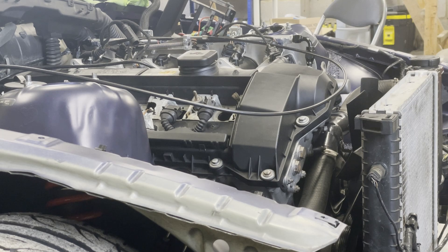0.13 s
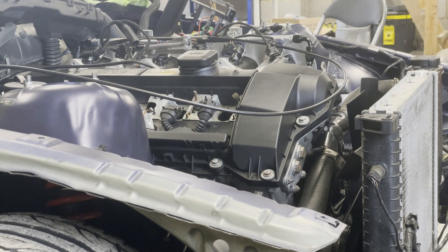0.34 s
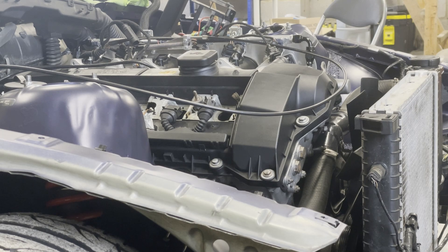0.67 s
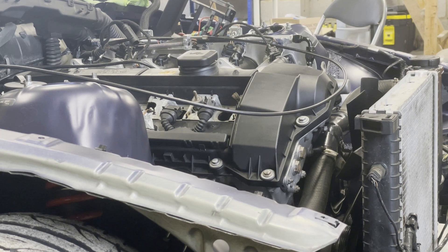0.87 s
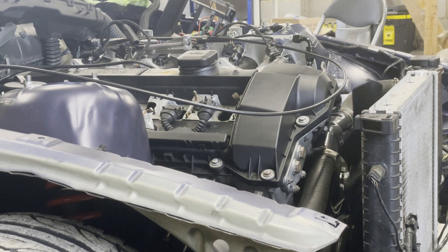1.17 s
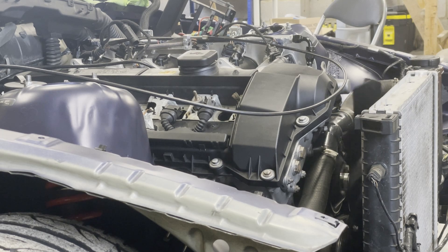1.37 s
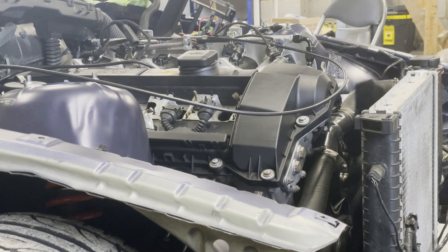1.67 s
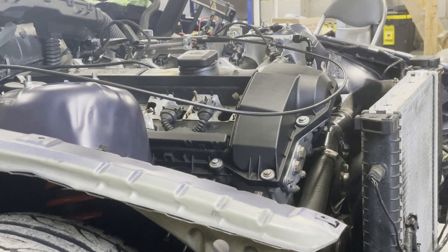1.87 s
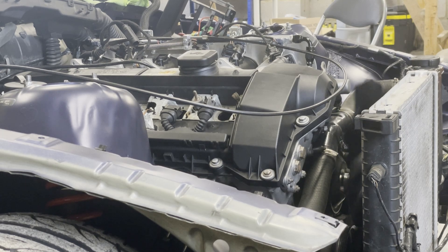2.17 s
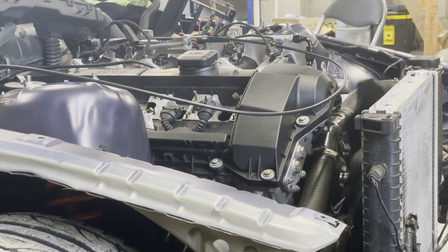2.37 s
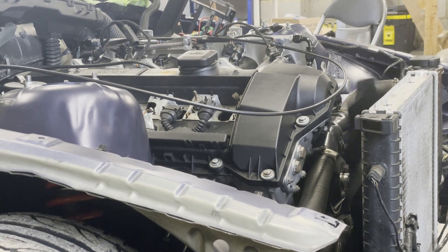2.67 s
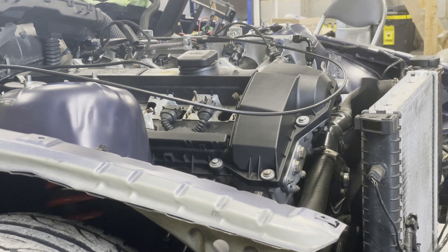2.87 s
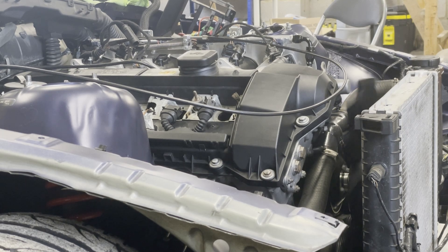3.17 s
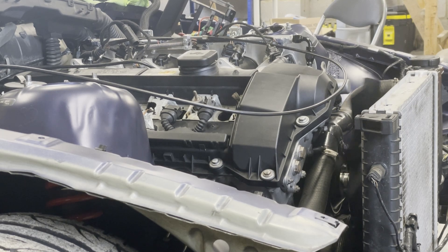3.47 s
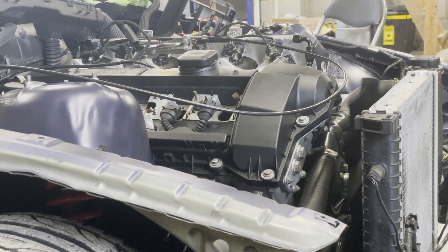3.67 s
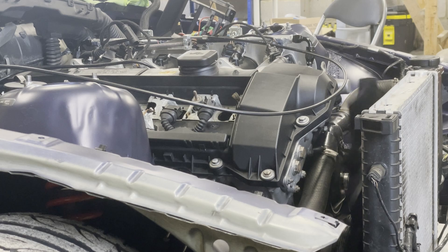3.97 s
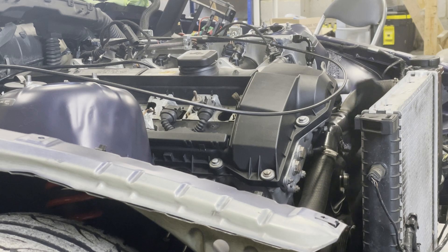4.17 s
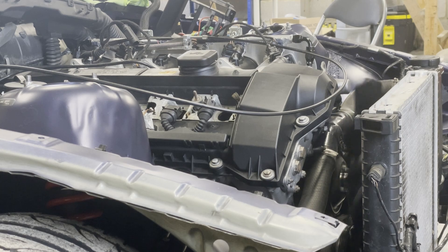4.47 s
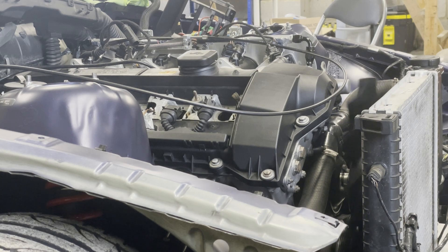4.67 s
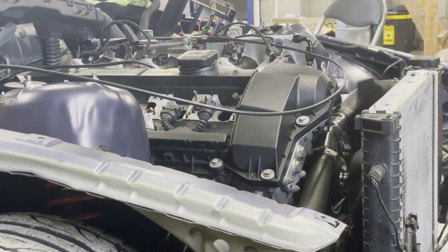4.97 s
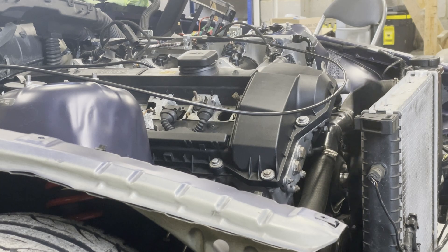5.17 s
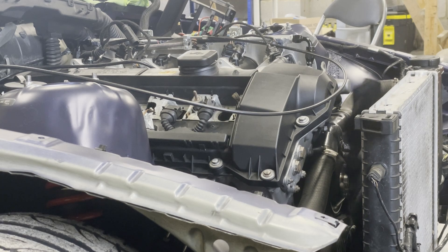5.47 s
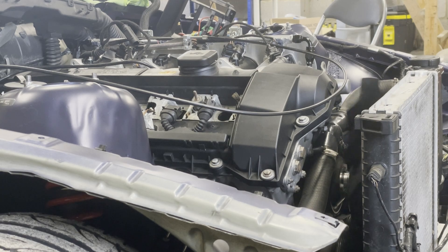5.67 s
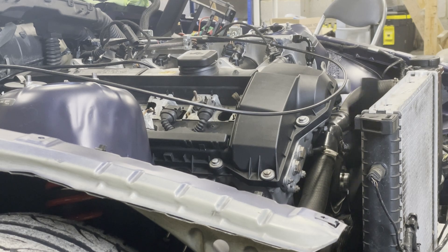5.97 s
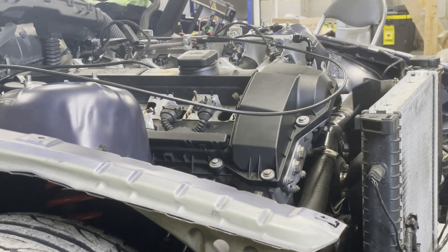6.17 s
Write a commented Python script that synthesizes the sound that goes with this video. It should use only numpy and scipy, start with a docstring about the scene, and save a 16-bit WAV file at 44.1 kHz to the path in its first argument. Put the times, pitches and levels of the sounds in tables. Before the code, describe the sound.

Close beside an open engine bay: near silence, a faint falling pump whirr, then a loud clash of gear teeth and a quick rising whir. The engine labours through its first slow compressions, then turns steadily at nearly eight pulses a second, gear whine swelling and sagging over deep soft booms and rattling metal. No ignition; it stops abruptly with a click and a dying hiss in a small hard room.

```python
"""Garage: a starter motor cranks a six-cylinder engine that does not fire.
A small pump winds down as a rough hum; the solenoid throws the pinion in with noise bursts and ringing modes.
Each compression loads the gears and slows them: tooth-rate whine, shaken block, drone, rattle, hiss.
Exhaust strokes of one bank boom as two pipe tones, rising as the piston climbs; squeaks come with the turns."""
import sys
import numpy as np
from scipy import signal
from scipy.fft import rfft, irfft, next_fast_len
from scipy.io import wavfile
from scipy.ndimage import uniform_filter1d

SR = 44100
rng = np.random.default_rng(int(sys.argv[2]) if len(sys.argv) > 2 else 0)


def inscribe(sig):
    """Save sig as 16-bit PCM at rate SR to the path in sys.argv[1].

    A 1-D sig is mono; a 2-D sig holds one channel per row.
    Samples are clipped to [-1, 1] before scaling.
    """
    pcm = np.round(np.clip(np.atleast_2d(sig).T, -1, 1) * 32767)
    wavfile.write(sys.argv[1], SR, pcm.astype(np.int16))


N = 279153


def from_db(db):
    """Gain of a level in dB."""
    return 10 ** (np.asarray(db) / 20)


def rms_one(x):
    """Scale to rms 1."""
    return x / np.sqrt(np.mean(x ** 2) + 1e-20)


def in_time(rows):
    """Table columns after time, linearly interpolated per sample."""
    time_s, *columns = np.transpose(rows)
    return [np.interp(np.arange(N) / SR, time_s, column) for column in columns]


def at_hz(points, hz):
    """Spectrum table interpolated on a log-frequency axis."""
    table_hz, values = np.array(points).T[:2]
    return np.interp(np.log(hz), np.log(table_hz), values)


def drift(rate_hz):
    """Slow random signal, rms 1: two-pole lowpass noise, computed at SR / 40."""
    r = np.exp(-80 * np.pi * rate_hz / SR)
    noise = rng.standard_normal(N // 40 + 2002)
    slow = signal.lfilter([1], [1, -2 * r, r * r], noise)[2000:]
    return np.interp(np.arange(N) / 40, np.arange(len(slow)), rms_one(slow))


def resonance(x, hz, width_hz):
    """Two-pole band, gain about 1 at its peak."""
    r = np.exp(-np.pi * width_hz / SR)
    zeros = np.array([1, 0, -1]) * (1 - r * r) / 2
    poles = [1, -2 * r * np.cos(2 * np.pi * hz / SR), r * r]
    return signal.lfilter(zeros, poles, x)


# left-right likeness: (frequency [Hz], likeness [0-1])
LIKENESS = [(380, 0.98), (950, 0.67), (2400, 1), (4500, 0.74), (7000, 0.69), (15000, 1)]
# phase lead of left over right: (frequency [Hz], lead [rad])
LEAD = [(100, 0), (430, .3), (1380, -.3), (3200, .5), (5200, .5), (6800, -.9), (8400, -3.0), (9400, -3.3),
        (11800, -6.2)]


def widen(mid, side):
    """Stereo: mid reaches left and right out of phase by LEAD, side enters with opposite signs."""
    hz = np.maximum(np.fft.rfftfreq(N, 1 / SR), 10)
    alike = np.clip(at_hz(LIKENESS, hz), 0, 1)
    sign = np.array([[1], [-1]])
    direct = rfft(mid) * np.sqrt(1 + alike) * np.exp(.5j * at_hz(LEAD, hz) * sign)
    return irfft(direct + rfft(side) * np.sqrt(1 - alike) * sign, N)


def coloured(spectrum):
    """Stereo noise of the given spectrum, rms 1."""
    hz = np.maximum(np.fft.rfftfreq(N, 1 / SR), 10)
    mid, side = irfft(rfft(rng.standard_normal((2, N))) * from_db(at_hz(spectrum, hz)), N)
    return rms_one(widen(mid, side))


# block and bell housing modes: (frequency [Hz], base width [Hz], relative level [dB])
BODY = [(268, 35, -8.5), (441.4, 36, -3.5), (568.7, 45, 2), (747.3, 46, 3), (884.5, 73, 2),
        (1115, 68, -1.5), (1302, 140, -1.5), (1525, 17, -5.5), (1585, 16, -7), (2100, 22, -7.5),
        (2222, 37, -4.5), (2797, 39, -6.5), (3176, 38, -9.5)]


def through_body(x, spread, waver_db):
    """Sum of wavering body resonances, base widths times spread."""
    out = 0
    for hz, width_hz, db in BODY:
        ring = resonance(resonance(x, hz, spread * width_hz), hz, spread * width_hz)
        out = out + from_db(db + waver_db * drift(16.0)) * ring / np.sqrt(width_hz / 50)
    return out


# starter effort, spin-up, long pull, key let go: (time [s], level [dB])
EFFORT = [(1.12, -7.5), (1.3, -1.5), (5.99, -1.5), (6.15, -7), (6.23, -18), (6.33, -26.5)]
# slow first compressions: (time [s], compressions passed [count])
SPIN_UP = [(1.12, 1.3), (1.24, 1.7), (1.488, 2.63), (1.655, 3.75)]
FIRST_COMPRESSION_S = 1.114   # a quarter stroke before the first exhaust stroke


def crank():
    """Half exhaust strokes passed, compressions passed, smoothed compressions per second, effort gain."""
    t = np.arange(N) / SR
    start_s = np.transpose(STROKES)[0]
    start_s = np.r_[FIRST_COMPRESSION_S, start_s, 2 * start_s[-1] - start_s[-2]]
    passed = np.r_[0, .5 + 2 * np.arange(len(start_s) - 1)]
    early_s, early = np.transpose(SPIN_UP)
    half_strokes = np.interp(t, start_s, passed)
    count = np.interp(t, np.r_[early_s, start_s[3:]], np.r_[early, passed[3:]])
    rate = uniform_filter1d(np.gradient(count) * SR, size=SR // 3)
    clash_s = ENGAGE[-1][0]
    effort = from_db(in_time(EFFORT)[0]) * (t > clash_s)
    return half_strokes, count, rate, effort


# quiet room noise: (frequency [Hz], relative density [dB per Hz])
FLOOR = [(25, -3.5), (70, -5.5), (700, -33), (3600, -46), (16000, -62)]
FLOOR_DB = -58.5


def room_floor():
    """Steady coloured noise, slowly wavering."""
    return from_db(FLOOR_DB + 2 * drift(6.9)) * coloured(FLOOR)


# pump: (time [s], pitch [Hz], hum level [dB], thud level [dB], air level [dB])
PUMP = [(0, 415, -74, -90, -57.5), (.19, 433, -59, -56, -57), (.225, 413, -68, -38.5, -56),
        (.4, 342, -66, -56, -75), (.46, 340, -95, -75, -86)]
# pump air noise: (frequency [Hz], relative density [dB per Hz])
AIR = [(180, -43), (300, -16), (2400, -28), (2850, -18), (3400, -26), (16000, -40)]
# pump low thud: (frequency [Hz], relative density [dB per Hz])
THUD = [(30, -25), (86, 0), (268, -16), (1200, -47)]


def pump():
    """Faint wavering three-harmonic hum, falling in pitch, plus air noise and a low thud."""
    hz, hum_db, thud_db, air_db = in_time(PUMP)
    turn = 2 * np.pi * np.cumsum(hz) / SR
    hum = sum(from_db(-5 * k + 2.9 * drift(21.4)) * np.sin((k + 1) * turn) for k in range(3))
    live = hum_db > PUMP[-1][2]
    thud = from_db(thud_db) * coloured(THUD)
    air = from_db(air_db) * coloured(AIR)
    return live * (from_db(hum_db) * hum + thud + air)


# pump switch, solenoid tick, pinion thrown out, pinion clash:
# (time [s], level before crack [dB], t60 [s], rise [s])
ENGAGE = [(0.182, -43, .15, 0.012), (1.062, -43, 0.7, 0.015), (6.052, -17, 0.18, 0.0027),
          (1.107, -5.5, 0.34, 0.0023)]
# pinion and starter nose modes: (frequency [Hz], relative level [dB])
PINION = [(1330, -14), (2600, 1.5), (5460, -8)]
# broad crash: (frequency [Hz], relative density [dB per Hz])
CLASH = [(120, -28.5), (200, -7), (870, -12.5), (1320, 0), (2700, -8), (6600, -8), (12000, -13.5)]
PINION_WIDTH_HZ, RING_DB = 100, 4
CRACK_DB, CRACK_S = 7, 0.0075   # louder crack opening each burst, its decay constant


def engage():
    """Fast-dying impacts: a broad crash and the ringing pinion modes."""
    t = np.arange(N) / SR
    fade = 0
    for time_s, db, t60_s, rise_s in ENGAGE:
        since_s = np.maximum(t - time_s, 0)
        burst_db = db - 60 * since_s / t60_s + CRACK_DB * np.exp(-since_s / CRACK_S)
        fade = fade + from_db(burst_db) * np.clip((t - time_s) / rise_s, 0, 1)
    blows = fade * rng.standard_normal((2, N))
    rings = sum(from_db(db) * resonance(blows, hz, PINION_WIDTH_HZ) for hz, db in PINION)
    return from_db(-6.0) * fade * coloured(CLASH) + from_db(RING_DB) * widen(*rings)


# pinion sliding in: (time [s], pitch [Hz], mean level [dB])
WHIR = [(1.11, 1230, -30), (1.185, 1367, -26), (1.22, 1390, -39)]


def whir():
    """Rising sine of the pinion, roughened by fast level drift."""
    hz, db = in_time(WHIR)
    t = np.arange(N) / SR
    live = (t > WHIR[0][0]) & (t < WHIR[-1][0])
    return live * from_db(db + 5 * drift(70)) * np.sin(2 * np.pi * np.cumsum(hz) / SR)


# slack take-up moment of each of the six cylinders: [share of compression interval]
JOLT_SHARES = [.58, .70, .63, .715, .655, .545]


def taken_up(count):
    """Count bent so each cylinder's jolt falls on the rise of the load table."""
    k = np.arange(int(count.max()) + 2)[:, None]
    jolt = np.array(JOLT_SHARES)[k % 6]
    free, rise = LOAD[3][0], LOAD[4][0]
    actual = k + np.c_[0 * jolt + free, jolt, 0 * jolt + 1]
    nominal = k + [free, rise, 1]
    return np.interp(count, actual.ravel(), nominal.ravel())


RATTLE_PER_S, RATTLE_DB = 600, -33.5   # contact rate at 0 dB load; rms level


def rattle(load_db):
    """Loose metal contacts: random clicks, denser under load, each ringing one of 12 pitches."""
    sizes = from_db(2.2 * np.minimum(rng.exponential(1, N), 5)) * rng.choice([-1, 1], N)
    born = rng.random(N) < RATTLE_PER_S * from_db(load_db + 3 * drift(8)) / SR
    pitches_hz = np.geomspace(2500, 6500, 12)
    dealt = rng.integers(0, len(pitches_hz), N)
    rings = 0
    for k, hz in enumerate(pitches_hz):
        rings = rings + resonance(sizes * born * (dealt == k) + 1e-18, hz, PINION_WIDTH_HZ)
    return from_db(RATTLE_DB) * rms_one(widen(rings, np.roll(rings, SR // 70)))


# one compression; teeth take up slack with a jolt, lose contact past the top:
# (interval share [0-1], relative load [dB], relative tooth noise [dB], relative whine [dB])
LOAD = [(0, 1.5, 0.5, 1), (.2, 1, -0.5, -6), (.32, -1, -2, -13), (.45, -4, -2.5, -21), (.64, -6, -2, -24),
        (.69, -2.5, -1.5, -8), (.85, 0, 0, -1)]
# gear whine: (multiple of tooth rate, relative level [dB])
MESH = [(1, -29), (2, -26.5), (3, -34), (4, -29.5)]
# armature whine: (multiple of tooth rate, relative level [dB])
ARMATURE = [(8, -1), (12, -11)]
# slow colour: (time [s], housing drone [dB], gear whine [dB], armature whine [dB])
STARTER = [(1.21, -34, -16, -44), (1.27, -16.5, -29, -35), (1.38, -31, -3.5, -45), (1.55, -22, 2, -34),
           (1.7, -32.5, 1, -24), (4.6, -28.5, 1, -25), (6.1, -27, 0.5, -28.5)]
# tooth and brush noise: (frequency [Hz], relative density [dB per Hz])
GRIND = [(76, -48), (150, -10), (280, -2), (400, -10), (680, -12), (1000, -9.5), (1700, -13.5),
         (3500, -15.5), (6600, -19.5), (11000, -24.5), (16000, -30.5)]
BODY_DB, GRIND_DB = -20.5, -21   # before load and effort
DRONE_HZ, DRONE_WIDTH_HZ = 884, 62   # width of each of two passes
TEETH = 37.3   # ring gear teeth per compression
SPEED_SWING, FASTEST_AT = 0.1144, .72   # share of speed, share of interval
JOLT_DB, JOLT_FADE = -2, 0.12   # mean level over the hiss at full effort, share of interval
HISS_FOLLOWS = .7   # exponent on effort: hiss runs on after the key is let go


def starter(count, rate, effort):
    """Gear and armature whine, ringing block, drone, rattle and hiss, driven by tooth load."""
    share, *levels = np.transpose(LOAD)
    bent = taken_up(count)
    since_jolt = np.maximum(bent - LOAD[4][0], 0) % 1
    load_db, noise_db, mesh_db = (np.interp(bent, share, db, period=1) for db in levels)
    drone_db, gear_db, armature_db = in_time(STARTER)

    # slows up each compression, speeds up past it
    swing = 1 + SPEED_SWING * np.cos(2 * np.pi * (count - FASTEST_AT))
    tooth = np.cumsum(TEETH * rate * swing * (1 + 0.00799 * drift(29.4))) / SR

    whine = 0
    for k, db in MESH:
        whine = whine + from_db(db + gear_db + mesh_db + 1.6 * drift(22.0)) * np.sin(2 * np.pi * k * tooth)
    rough = 1 + .45 * drift(110)   # uneven brush contact smears the line
    armature = sum(from_db(db) * np.sin(2 * np.pi * k * tooth) for k, db in ARMATURE)
    whine = whine + from_db(armature_db + mesh_db) * rough * armature
    whine = whine + through_body(whine, spread=4.84, waver_db=1)   # lines flare crossing a resonance
    whine = widen(whine, np.roll(whine, SR // 90))

    # tooth contacts modulate the noise shaking the block
    shake = rng.standard_normal((2, N)) * (1 + 0.58 * np.cos(2 * np.pi * tooth))
    block = rms_one(widen(*through_body(shake, spread=1.04, waver_db=2.0)))
    block = from_db(BODY_DB + 1.09 * load_db) * block

    drone = resonance(rng.standard_normal((2, N)), DRONE_HZ, DRONE_WIDTH_HZ)
    drone = resonance(drone, DRONE_HZ, DRONE_WIDTH_HZ)
    drone = from_db(drone_db + 0.71 * load_db + 0.86 * drift(8.7)) * rms_one(widen(*drone))

    hiss = from_db(GRIND_DB + noise_db + 0.99 * drift(9.7)) * coloured(GRIND)
    jolt = from_db(JOLT_DB + 2 * drift(3.0)) * np.exp(-since_jolt / JOLT_FADE)
    hiss = hiss * (1 + (count > 2) * effort * jolt)
    metal = whine + block + drone + rattle(1.2 * noise_db)
    return effort * metal + effort ** HISS_FOLLOWS * hiss


# dull block knocks, the first as the pinion seats: (time [s], blow level [dB])
KNOCKS = [(1.176, -3), (1.689, -1.5), (5.835, -3)]
KNOCK_T60_S = 0.13


def knocks():
    """Decaying noise blows ringing the block."""
    t = np.arange(N) / SR
    fade = 0
    for time_s, db in KNOCKS:
        fade = fade + from_db(db - 60 * np.maximum(t - time_s, 0) / KNOCK_T60_S) * (t > time_s)
    blow = fade * rng.standard_normal((2, N))
    return widen(*through_body(blow + 1e-18, spread=1.9, waver_db=1.5))


# exhaust strokes, each pushing the pipe twice: (start [s], lower tone first push [dB],
# lower second push [dB], upper tone first push [dB], upper second push [dB])
STROKES = [(1.203, -10, -26.5, -17, -25.5), (1.49, -3, -11, -24, -16), (1.76, -6.5, -14.5, -19, -13),
           (2.034, -5, -15, -11, -19), (2.303, -9, -10, -11.5, -18.5), (2.565, -6, -13, -18.5, -20.5),
           (2.825, -5, -14.5, -11.5, -22), (3.09, -17, -9.5, -12, -17), (3.356, -5.5, -13, -18.5, -12),
           (3.624, -4.5, -12, -15, -21), (3.9, -8, -12.5, -21, -16), (4.176, -8, -12, -15, -20),
           (4.455, -7.5, -19, -15, -13), (4.736, -9.5, -18.5, -14, -21.5), (5.022, -7, -12.5, -20, -15.5),
           (5.313, -3.5, -13.5, -23.5, -14), (5.61, -19, -11.5, -18, -19), (5.913, -8, -12.5, -16.5, -22),
           (6.216, -13.5, -40, -42, -38.0)]
# through a stroke: (stroke share [0-1], second-push share [0-1], lower tone [dB], upper tone [dB])
PUSH = [(0, 0, -4.5, -29), (.12, 0.14, -2.5, 4), (.45, 0.41, -2, 0.5), (.63, 1, 6, 2),
        (.8, 0.96, -1.5, -9.5), (.96, 0.81, -3, -14)]
# mean pitch through a stroke: (stroke share [0-1], lower tone [Hz], upper tone [Hz])
PIPE_HZ = [(0, 57.02, 90.3), (0.501, 61.49, 98.95), (.7, 67.92, 106), (1, 72.9, 107)]
# before the first push: lower tone, upper tone [dB]
BEFORE_PUSH_DB = [-56, -33.5]
FIRST_PUSH = 0.31   # share of the first stroke before the pipe sounds
STOP_SHARE = 0.78   # crank coasts to rest: pitch holds at this share of the last full stroke


def exhaust(half_strokes):
    """Two pipe tones, rising as cylinder volume shrinks; level moves from first push to second."""
    strokes = (half_strokes - .5) / 2
    row = np.clip(strokes, 0, len(STROKES) - 1).astype(int)
    done = strokes % 1
    pushes = np.array(STROKES)[row, 1:].T.reshape(2, 2, N)
    share, second, *shapes = np.transpose(PUSH)
    second = np.interp(done, share, second)
    pitch_share, *pitches = np.transpose(PIPE_HZ)
    pitch_done = np.minimum(strokes, len(STROKES) - 2 + STOP_SHARE) % 1
    out = 0
    for (first_db, second_db), shape_db, pitch, early_db in zip(pushes, shapes, pitches, BEFORE_PUSH_DB):
        hz = uniform_filter1d(np.interp(pitch_done, pitch_share, pitch), size=SR // 50)
        hz = hz * (1 + 0.03167 * drift(10.38) + 0.031 * drift(28.7))
        db = first_db + (second_db - first_db) * second + np.interp(done, share, shape_db)
        gain = from_db(np.where(strokes < FIRST_PUSH, early_db, db)) * (half_strokes > 0)
        gain = uniform_filter1d(gain, size=SR // 60) * from_db(2.0 * drift(19.3))
        out = out + np.sqrt(2) * gain * np.sin(2 * np.pi * np.cumsum(hz) / SR)
    return widen(out, 1.25 * np.roll(out, SR // 30)) * from_db([[-3.6], [-2.4]])


# squeak about once a turn: (time [s], relative level [dB])
SQUEAKS = [(2.094, -8), (2.489, -4), (2.883, -7), (3.287, -5.5), (3.691, -12), (4.106, -4.5), (4.949, -7.5)]
SQUEAK_START_HZ = 1341


def squeaks(rise_s=0.0082, fall_s=0.0081):
    """Short bursts of a slightly falling tone with narrow-band noise."""
    out, t = np.zeros(N), np.arange(SR // 10) / SR
    shape = (1 - np.exp(-t / rise_s)) ** 2 * np.exp(-t / fall_s)
    tone = np.sin(2 * np.pi * SQUEAK_START_HZ * t * (1 - .5 * t))
    for time_s, db in SQUEAKS:
        noise = rng.standard_normal(len(t))
        rough = .5 * rms_one(resonance(noise, SQUEAK_START_HZ, 120))
        i = round(time_s * SR)
        out[i:i + len(t)] += from_db(db - 5.0) * shape / shape.max() * (tone + rough)
    return widen(out, 0 * out) / np.sqrt(2)


GARAGE_T60_S, GARAGE_DB = 0.13, -9   # t60 at 3 kHz


def garage(x):
    """Room echo: feedback delays, eight a side, decaying faster in the treble."""
    size = next_fast_len(N + SR)
    hz = np.fft.rfftfreq(size, 1 / SR)
    spectrum, out = rfft(x, size), np.zeros((2, len(hz)), complex)
    for k, lag_s in enumerate(rng.uniform(.02, .055, 16)):
        loss = from_db(-60 * lag_s / GARAGE_T60_S * (0.5 + hz / 6000))
        loop = loss * np.exp(-2j * np.pi * hz * lag_s)
        out[k % 2] += spectrum * loop / (1 - loop) * (-1) ** (k // 2)
    return irfft(out, size)[:, :N]


def scene():
    """Starter metal and its garage echo, exhaust, pump, quiet room."""
    half_strokes, count, rate, effort = crank()
    metal = engage() + whir() + starter(count, rate, effort) + knocks() + squeaks()
    echo = from_db(GARAGE_DB) * garage(metal.mean(axis=0))
    return room_floor() + pump() + metal + exhaust(half_strokes) + echo


STOPBAND_HZ = 16250   # 60 dB down from here up


def record(dry):
    """Cut the lowest bass, round the peaks, cut the top."""
    highpass = signal.butter(3, 46, "high", fs=SR, output="sos")
    lowpass = signal.cheby2(22, 60, STOPBAND_HZ, fs=SR, output="sos")
    thin = signal.sosfilt(highpass, dry)
    rounded = 1.38 * np.tanh(thin / 1.384)
    return signal.sosfilt(lowpass, rounded)


dry = scene()
out = record(dry)
inscribe(out)
```